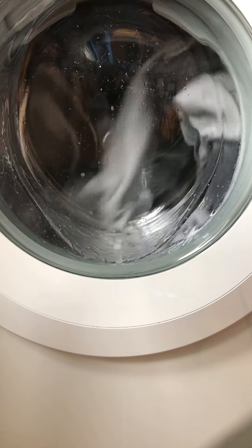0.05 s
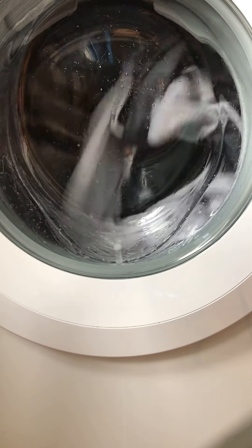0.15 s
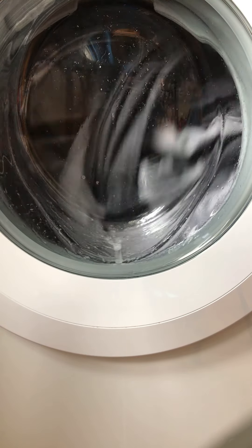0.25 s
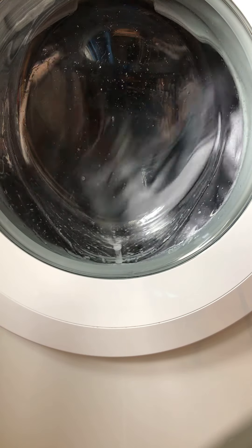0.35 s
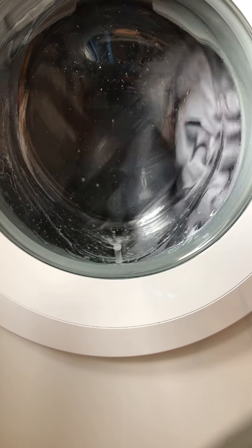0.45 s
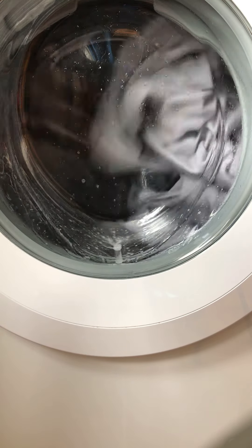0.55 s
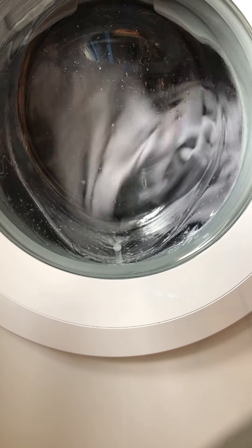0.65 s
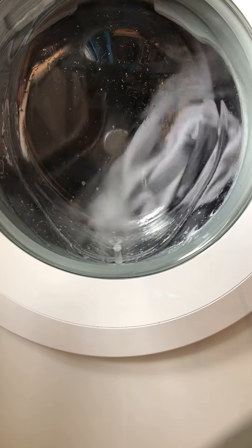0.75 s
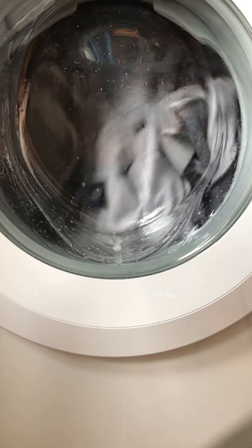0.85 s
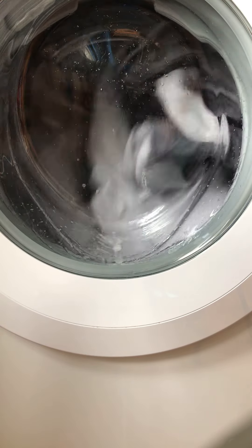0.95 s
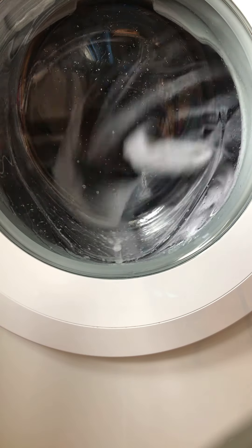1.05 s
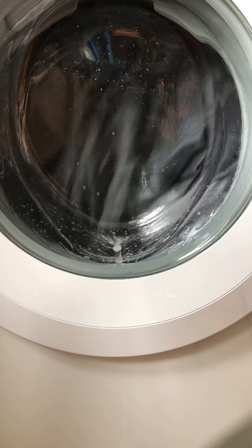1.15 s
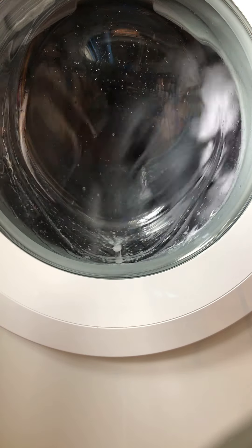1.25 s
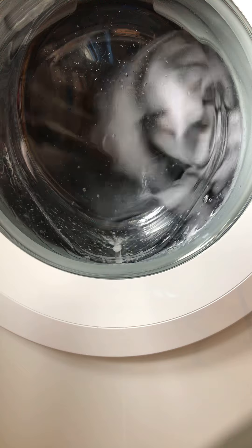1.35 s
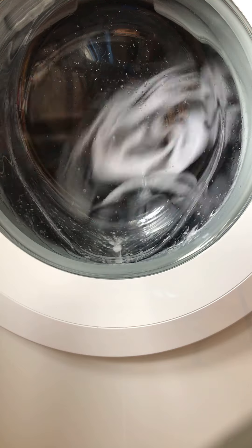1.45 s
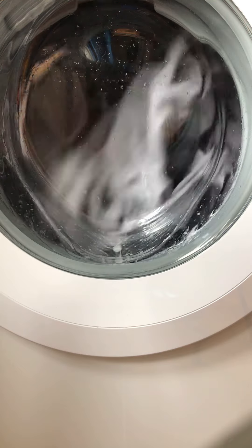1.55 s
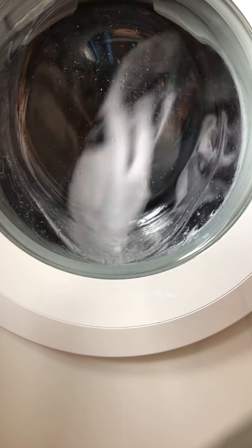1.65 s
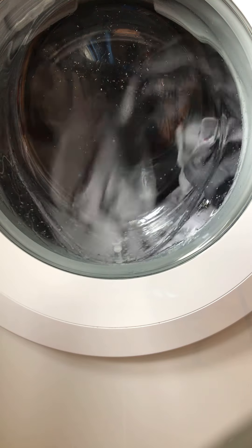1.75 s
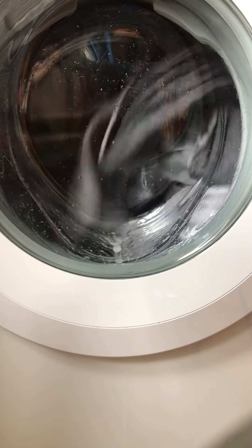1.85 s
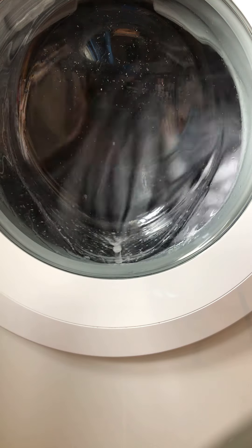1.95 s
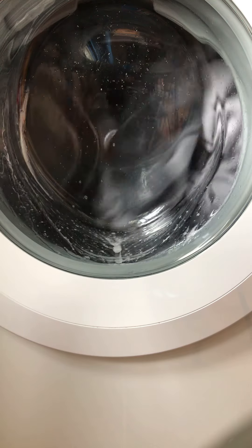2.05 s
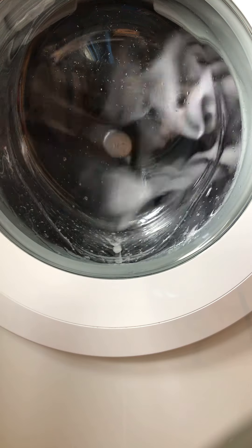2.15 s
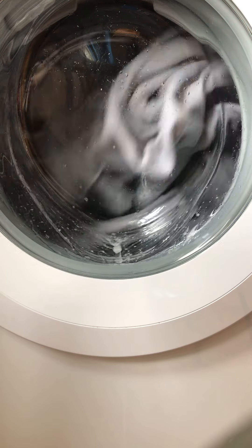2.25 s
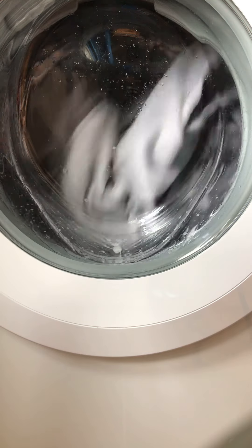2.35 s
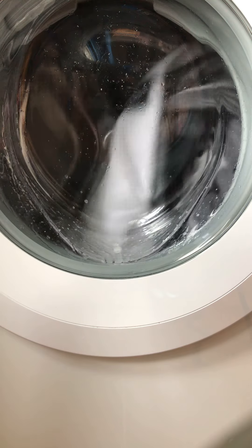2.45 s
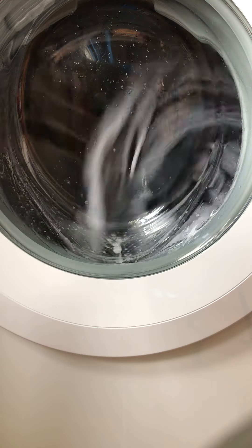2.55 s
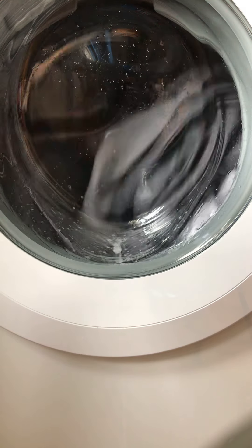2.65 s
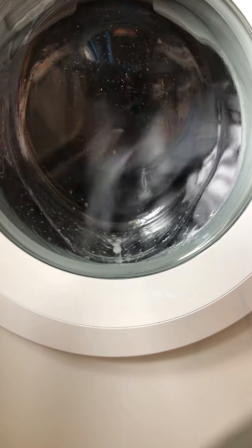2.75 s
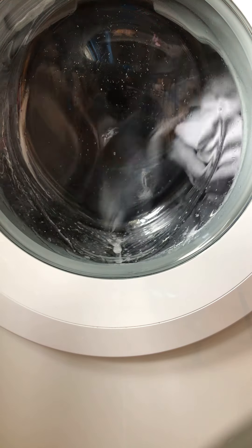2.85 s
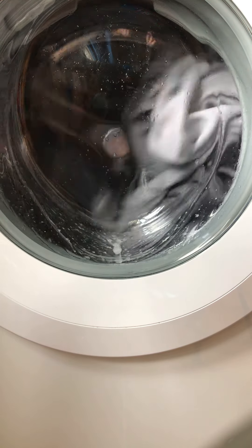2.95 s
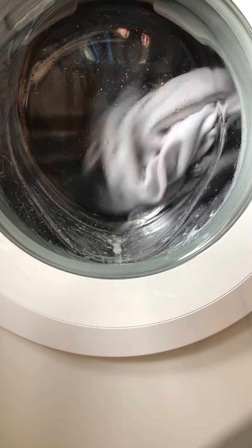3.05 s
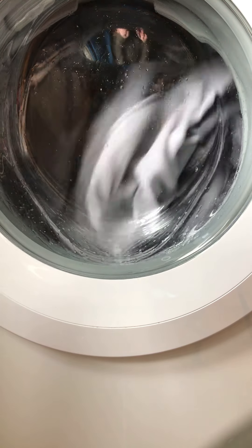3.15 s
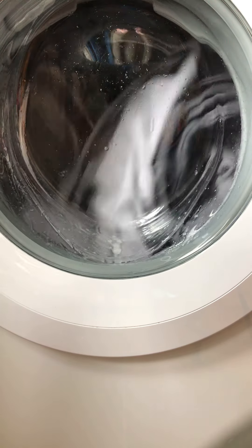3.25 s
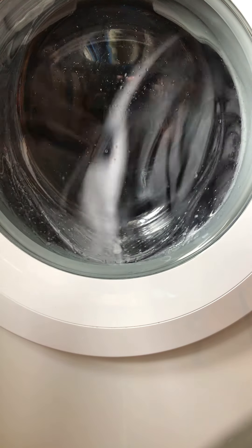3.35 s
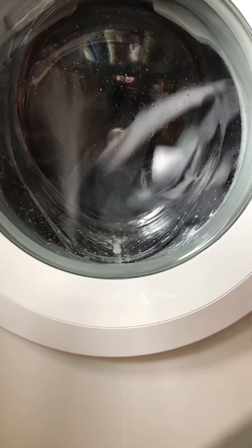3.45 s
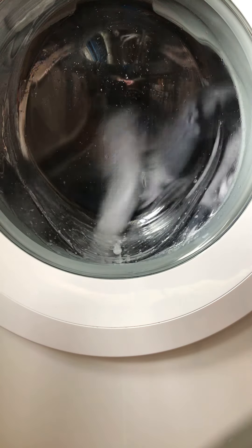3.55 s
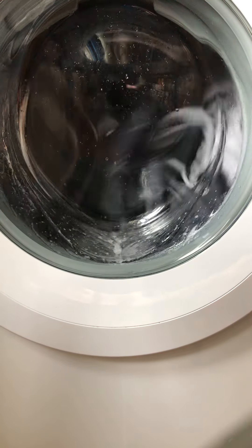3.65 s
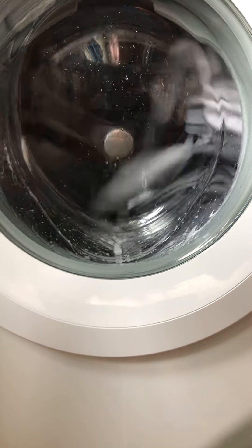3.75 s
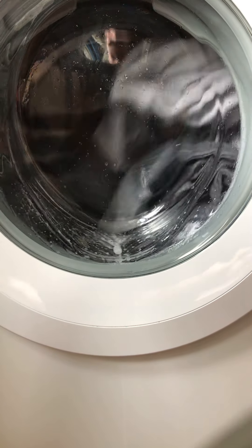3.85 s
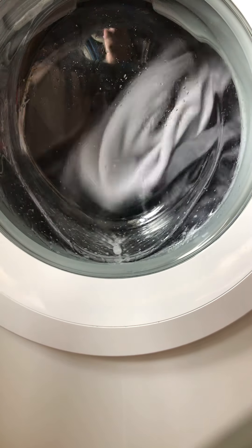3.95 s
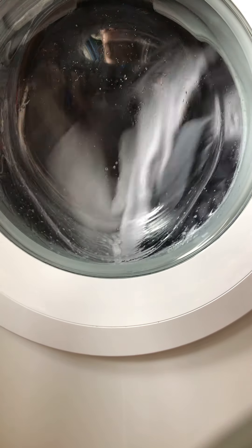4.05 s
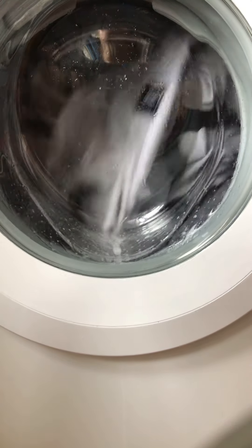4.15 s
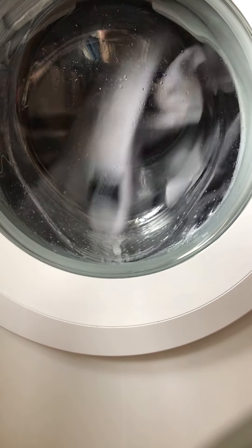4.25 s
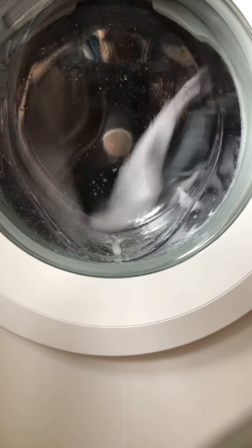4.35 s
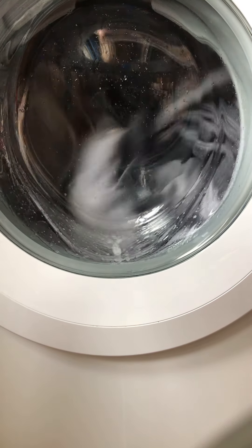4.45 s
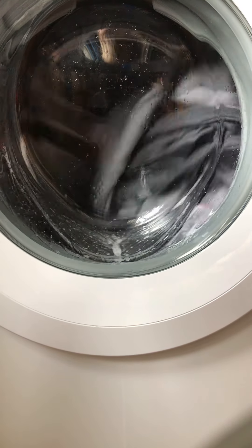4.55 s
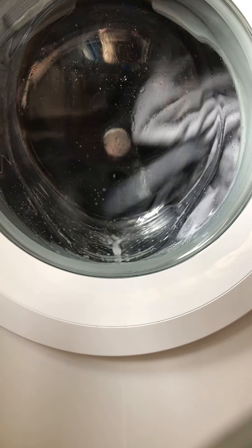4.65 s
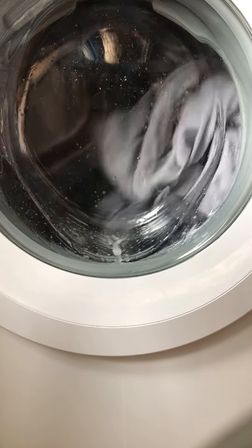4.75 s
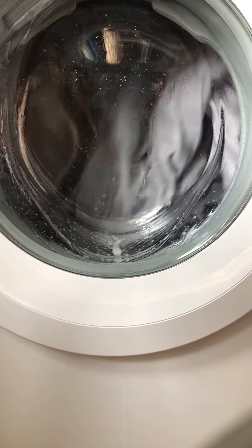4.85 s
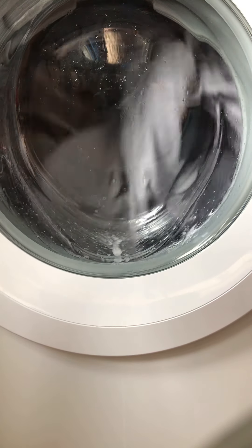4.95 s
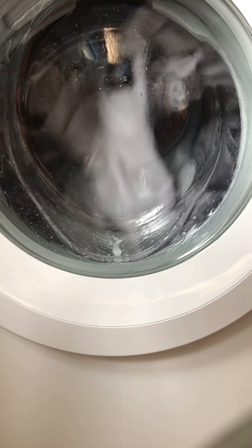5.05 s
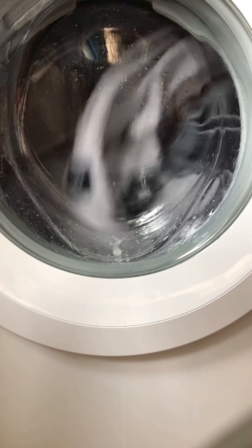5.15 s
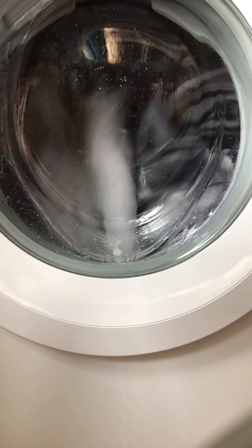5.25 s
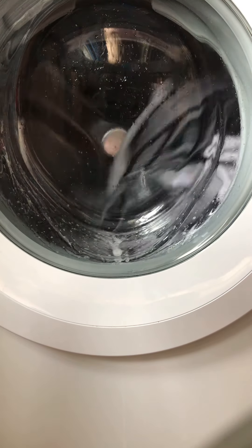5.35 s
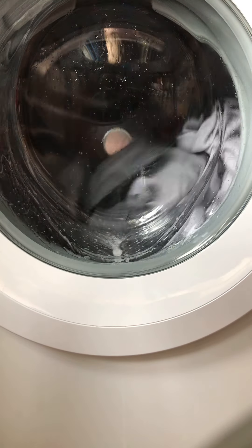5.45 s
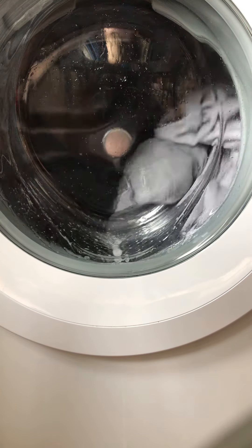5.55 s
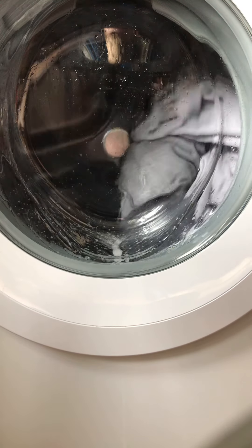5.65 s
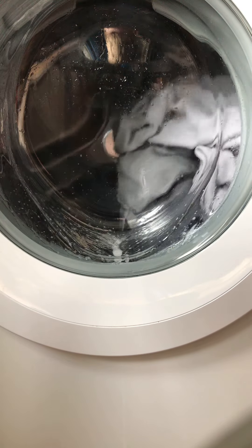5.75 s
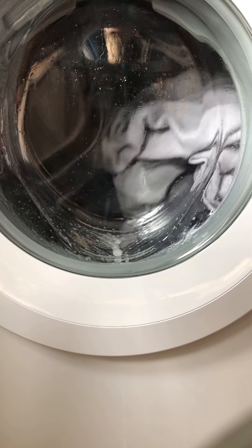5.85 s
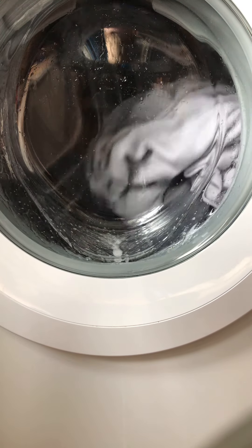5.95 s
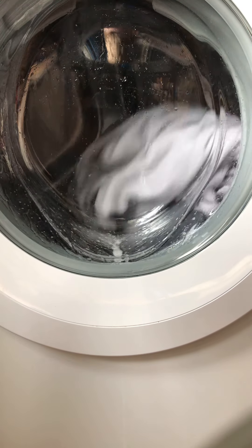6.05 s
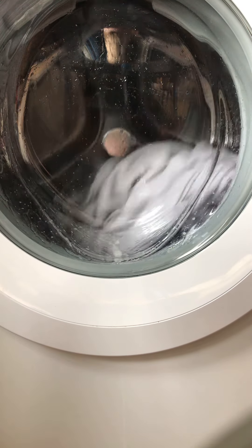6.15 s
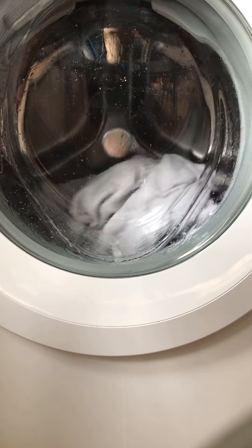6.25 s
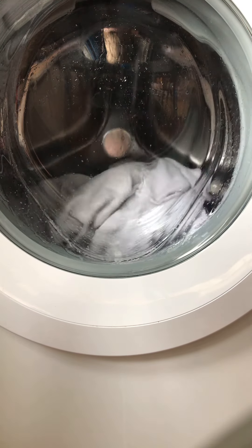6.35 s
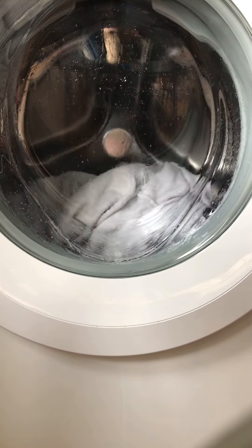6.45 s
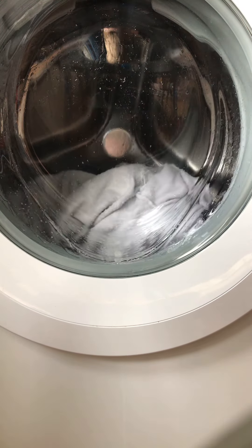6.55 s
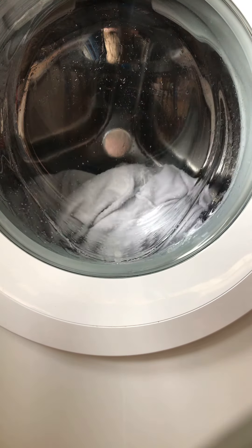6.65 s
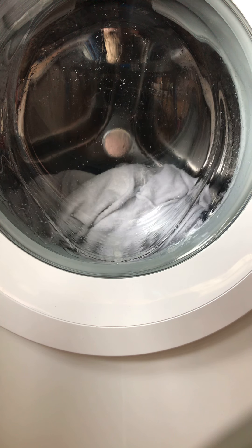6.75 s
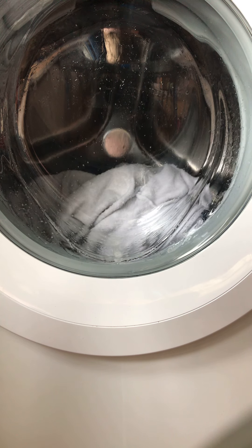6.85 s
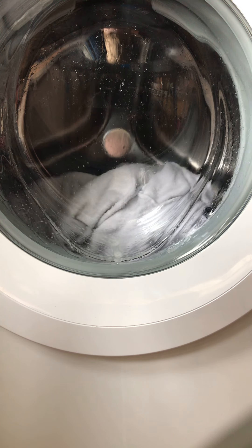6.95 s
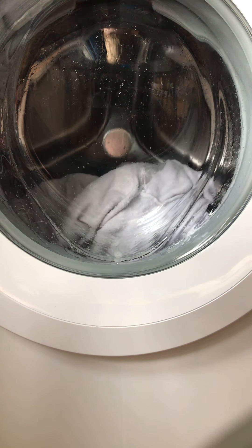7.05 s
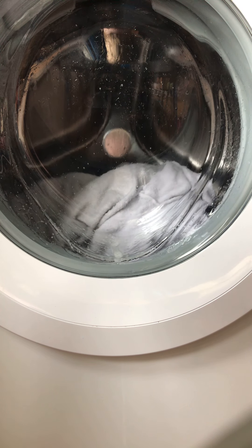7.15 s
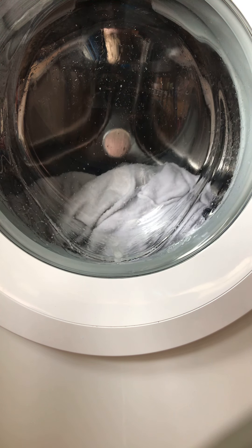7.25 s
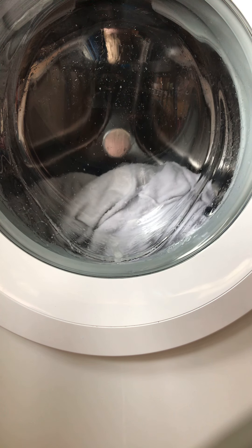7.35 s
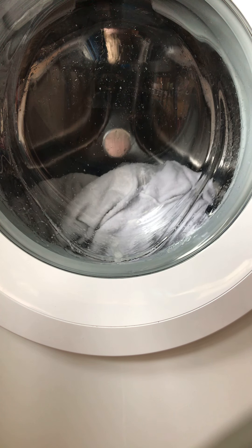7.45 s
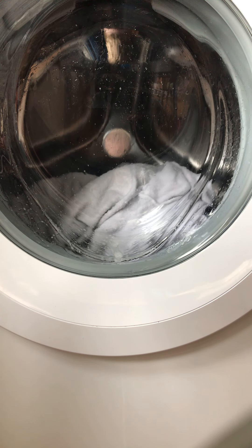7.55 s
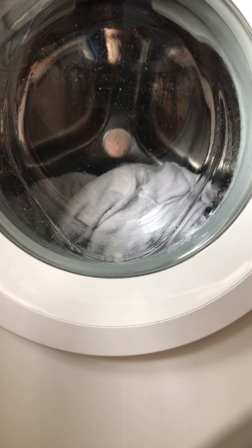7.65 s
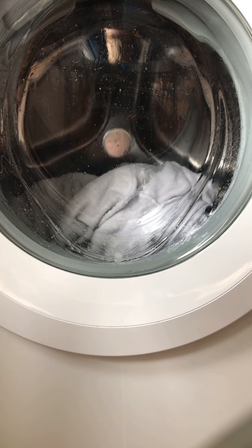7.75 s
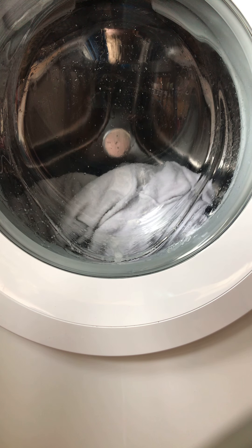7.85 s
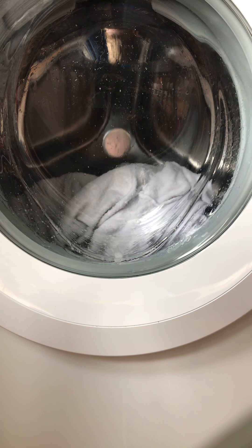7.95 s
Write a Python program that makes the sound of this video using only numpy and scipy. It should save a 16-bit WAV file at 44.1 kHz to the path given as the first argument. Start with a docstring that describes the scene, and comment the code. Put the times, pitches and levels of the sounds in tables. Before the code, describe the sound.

Behind a washing machine's glass door, soaked clothes tumble with splatting slaps, sloshing and gurgles for six seconds, then nearly quiet with a few drips.

```python
"""Wet wash tumbling behind a glass door

A front-loading washing machine turns wet laundry, with the microphone just outside the glass door.
Bursts of grains shaped by drum resonances make the slaps and spray; decaying low sines make the tub's thumps.
Sloshing noise, bubbles, notes of trapped air and dry ticks fill the gaps, with echoes off drum and room.
Near six seconds the drum comes to rest, leaving a low noise drone and a few drips."""
import sys
import numpy as np
from scipy import signal
from scipy.fft import rfft, irfft
from scipy.io import wavfile

SR = 44100
rng = np.random.default_rng(int(sys.argv[2]) if len(sys.argv) > 2 else 0)


def put_to_file(sound):
    """Save the sound as 16-bit audio at rate SR, in the file named by the first command-line argument."""
    columns = np.atleast_2d(sound).T  # one column per channel
    safe = np.clip(columns, -1, 1)
    whole_steps = np.round(safe * 32767)
    wavfile.write(sys.argv[1], SR, whole_steps.astype(np.int16))


N = 352800
TIME = np.arange(N) / SR  # s
TAPS = 8192
FREQS = np.fft.rfftfreq(TAPS, 1 / SR) + 1  # frequency grid of the filters, Hz

# wet cloth landing on the drum: [t/s, time to full contact/s, smack level/dB,
# weight: thud over smack/dB, wetness: spray over smack/dB]
CLOTH_LANDINGS = [(0.001, 0.011, -45, -3, -4), (0.024, .011, -44, 3.5, -4), (0.077, 0.0081, -31, -6.5, -8),
                  (0.119, 0.0091, -48.5, 5, 0.5), (0.305, 0.0085, -32.5, -11, -3.5),
                  (0.355, 0.039, -52, 7, -14), (0.506, 0.031, -49.5, 4, -12.5),
                  (0.68, 0.063, -54.5, 3.5, -9.5), (0.969, 0.016, -46.5, 8.5, -11.5),
                  (1.019, 0.0056, -36, -7, 4.5), (1.141, 0.007, -40.5, -13, -3.5),
                  (1.16, 0.049, -53.5, 4, -5.5), (1.245, 0.012, -45, 2, -16), (1.494, 0.0076, -53, 10, -13),
                  (1.571, 0.0079, -49.5, 10, 5.5), (1.651, 0.014, -37, -7.5, -4.5),
                  (1.821, 0.011, -41, 3, -11.5), (1.863, 0.0059, -45.5, 8, 9), (1.958, 0.0085, -41, -4, -8),
                  (2.02, 0.011, -42.5, -2.5, -4), (2.179, 0.016, -50, 3, -10), (2.415, 0.024, -56.5, 3, -8),
                  (2.515, .011, -34.5, -7.5, -11), (2.665, .013, -39, -1, -14),
                  (2.684, 0.0057, -38, -1.5, 0.5), (2.829, 0.0095, -40, 1, -13), (2.955, 0.038, -52, 7, -7),
                  (3.149, 0.0077, -44, 5.5, -11), (3.455, 0.038, -54, -1, -5),
                  (3.511, 0.0085, -40.5, 8.5, -11.5), (3.726, 0.005, -50, 2.5, -18),
                  (3.772, 0.0095, -32.5, -2, -17), (3.995, 0.038, -53, 4.5, -7.5),
                  (4.11, 0.045, -56, 0, -8.5), (4.308, 0.065, -51.5, -2, -10.5),
                  (4.585, 0.0071, -41, 3, -14.5), (4.695, 0.0092, -43.5, -4, -2),
                  (4.72, 0.0082, -45.5, 9, -24), (4.787, 0.0048, -47.5, 1, 7.5), (5.12, 0.03, -52.5, 1, -8),
                  (5.293, 0.011, -43, 11, -11), (5.508, 0.012, -50, 4, -16),
                  (5.531, 0.0055, -43.5, 1.5, -11), (5.565, 0.0063, -41.5, 5.5, -20),
                  (5.965, .03, -68.5, 2, -7), (6.11, 0.03, -71.5, -2, -8)]


def amp(db):
    """Decibels to gain."""
    return 10 ** (np.asarray(db) / 20)


def unit(x):
    """Scales to rms 1."""
    return x / np.sqrt(np.mean(x ** 2) + 1e-20)


def shape(points):
    """Gain over frequency from (f/Hz, level/dB) points, joined on a log frequency axis."""
    hz, db = np.transpose(points)
    return amp(np.interp(np.log(FREQS), np.log(hz), db))


def add(mix, s, sound):
    """Mixes a sound in at a time."""
    part = mix[max(round(s * SR), 0):][:len(sound)]
    part += sound[:len(part)]


def colour(x, gain):
    """Causal, minimum-phase filter of unit energy: resonances ring after the blow."""
    log_gain = np.log(np.maximum(gain / gain.max(), 1e-5))
    circle = np.concatenate([log_gain, log_gain[-2:0:-1]])
    spectrum = np.exp(np.conj(signal.hilbert(circle)))
    ring = np.fft.ifft(spectrum).real
    return signal.oaconvolve(x, ring / np.linalg.norm(ring))[:N]


def wander(per_s):
    """Slow chance of rms 1: noise with a Gaussian roll-off above per_s (Hz)."""
    hz = np.fft.rfftfreq(N, 1 / SR)
    spectrum = rfft(rng.standard_normal(N)) * np.exp(-(hz / per_s) ** 2)
    return unit(irfft(spectrum, N))


def grains(per_s, spread_db):
    """Tiny water impacts of random time, sign and size, scaled to rms 1."""
    size = amp(spread_db * np.minimum(rng.exponential(1, N), 4))
    sign = rng.choice([-1., 1.], N)
    struck = rng.random(N) < per_s / SR
    return unit(size * sign * struck)


def swells(rows):
    """Level of overlapping bursts (t/s, rise/s, peak/dB): quick ones snap on, slow ones swell; all die away."""
    roundness, soft_s = 1.05, 0.015  # exponent of a quick burst; slower rises are rounder still
    power = np.zeros(N)
    for s, rise, db in rows:
        u = TIME[:SR // 2] / max(rise, .001)
        burst = (u * np.exp(1 - u)) ** max(roundness, rise / soft_s)
        add(power, s, (amp(db) * burst) ** 2)
    return np.sqrt(power)


def drum(low_hz, high_hz, ringing=1, order=8):
    """Response of drum and door to a force over one band; wet cloth lying on the steel lessens the ringing."""
    # resonances of the drum and door: [f/Hz, width/Hz, level over the broad response at full ringing/dB]
    drum_modes = [(256.4, 4.1, 11), (314, 7.9, 13), (383, 18.4, 9), (467, 6.5, 5), (500, 127, 10),
                  (553.6, 12.4, 15), (905, 13, 11), (1083, 60, 12.5), (1222.4, 59, 13.5), (1340, 45, 7),
                  (1600, 94, 7), (1760, 81, 1.5), (1737, 147, 4), (2626, 150, 2.5), (2950, 95, -5),
                  (3850, 160, -2), (3810, 48, 5), (5410, 53, 10), (6430, 1200, 5)]
    # broad response of the drum through the door: [f/Hz, relative level/dB]
    through_door = [(100, 18), (200, 0.5), (330, 1.5), (560, -1), (740, -4.5), (1200, -3.5), (1800, -4),
                    (2300, -8), (3600, -11), (4700, -19), (6500, -23.5), (9000, -26.5), (11000, -29.5),
                    (15500, -23.5)]
    peaks = sum((amp(db) ** 2 - 1) / (1 + (2 * (FREQS - hz) / width) ** 2)
                for hz, width, db in drum_modes)
    band = 1 / (1 + (low_hz / FREQS) ** order) / (1 + (FREQS / high_hz) ** order)
    return shape(through_door) * np.sqrt(np.maximum(1 + ringing * peaks, .1) * band)


def echoes(x, wet_db, low_t60, high_t60):
    """Dense reflections in the steel drum and the small room; bass and treble decay at their own t60 (s)."""
    count = SR // 2
    build_up = np.minimum(TIME[:count] / 0.0035, 1)
    taps = rng.standard_normal(count) * (rng.random(count) < .1) * build_up
    hz, t, z = signal.stft(taps, SR, nperseg=256)
    t60 = np.interp(np.log(hz + 1), np.log([300, 6000]), [low_t60, high_t60])
    decay = np.exp(-np.log(1000) * t / t60[:, None])
    tail = signal.istft(z * decay, SR, nperseg=256)[1]
    return amp(wet_db) * signal.oaconvolve(x, tail / np.linalg.norm(tail))[:N]


def turning_echoes(x, turns_per_s, count=3):
    """The load shifts as the drum turns, so the sound fades between several patterns of reflections."""
    wet = np.zeros(N)
    for k in range(count):
        share = np.cos(np.pi * (turns_per_s * TIME + k / count)) * np.sqrt(2 / count)
        wet += echoes(x * share, wet_db=-4, low_t60=0.29, high_t60=0.28)
    return x + wet


def drone():
    """Steady low noise of the machine and the room."""
    # spectrum of the machine at rest: [f/Hz, relative level per Hz/dB]
    rest_spectrum = [(20, -41), (40, -5), (60, -20.5), (100, -9), (170, -4.5), (420, -8), (700, -11),
                     (1250, -15), (2000, -21), (4500, -24), (6200, -23.5), (10000, -34), (12500, -31.5),
                     (15500, -35)]
    level_db = -68.5
    return amp(level_db) * colour(rng.standard_normal(N), shape(rest_spectrum))


def rumble():
    """Low noise of the tub: it sways on its springs and is shaken by every slap."""
    # the tub swaying on its springs: [t/s, level/dB]
    tub_sway = [(0.0, -52), (0.18, -64.5), (1.31, -66), (1.8, -55), (2.16, -60), (3.43, -59.5),
                (3.96, -53.5), (5.08, -65.5), (5.39, -57), (5.84, -73), (8.0, -72)]
    # spectrum of the tub's low noise: [f/Hz, relative level per Hz/dB]
    tub_spectrum = [(24, -23.5), (40, -11.5), (60, -0.5), (75, 0), (93, -1), (115, -5.5), (160, -14),
                    (260, -11.5), (600, -67)]
    shake_s, shake_over_thud_db = 0.028, -13  # time to the peak, level
    shakes = swells((s, shake_s, smack_db + weight_db + shake_over_thud_db)
                    for s, _, smack_db, weight_db, _ in CLOTH_LANDINGS)
    sway = amp(np.interp(TIME, *np.transpose(tub_sway)))
    return colour(np.hypot(sway, shakes) * rng.standard_normal(N), shape(tub_spectrum))


def thumps(ring_cycles, sag, bend, bend_s):
    """The tub swings up while the load pushes on it, then rings down in a few cycles; its pitch sinks."""
    # heavy drops that rock the tub: [t/s, peak level before the unevenness/dB, f before the bend/Hz, push/s]
    heavy_drops = [(0.08, -44, 133, 0.047), (1.556, -36, 91, .01), (1.581, -37.5, 42.6, 0.024),
                   (2.768, -46.5, 87, .047), (3.193, -45.5, 91, 0.048), (3.51, -42, 64.5, .012),
                   (3.511, -41, 130, 0.014), (3.733, -34.5, 95.8, 0.022), (3.778, -36, 87.6, .031),
                   (4.039, -25.5, 100.2, 0.065), (4.136, -37.5, 95.8, 0.037), (4.727, -38, 99.4, .008),
                   (4.728, -44, 180, 0.018), (5.173, -47, 96.3, 0.058), (7.025, -50.5, 95.2, 0.058),
                   (7.56, -60, 103, 0.1), (7.68, -57.5, 106.5, 0.056)]
    out, t = np.zeros(N), TIME[:SR // 2]
    for s, db, hz, push in heavy_drops:
        rise = np.sin(np.pi / 2 * np.minimum(t / push, 1)) ** 2
        decay = np.exp(-np.maximum(t - push, 0) * hz / ring_cycles)
        high_start = bend * np.exp(-t / bend_s)
        sinking = sag * np.tanh((t - push) * hz / ring_cycles)
        pitch = hz * (1 + high_start - sinking)
        add(out, s, amp(db) * rise * decay * np.sin(2 * np.pi * np.cumsum(pitch) / SR))
    uneven_db = 2.0 * wander(45)  # a load never pushes quite evenly
    return out * amp(uneven_db)


def stirring():
    """Level of the water stirred by the drum (dB), gone once the load lies still."""
    # how hard the turning load stirs the water: [t/s, level before settling/dB]
    load_stir = [(0.14, -54), (0.58, -55), (0.78, -55.5), (1.03, -60), (1.15, -53.5), (1.57, -51.5),
                 (1.88, -53), (2.33, -53.5), (2.74, -53), (3.33, -56), (3.95, -54.5), (4.33, -54.5),
                 (5.46, -55), (5.64, -70.5), (6.2, -64.5)]
    rest_s, settle_db_per_s = 6.17, 110
    return np.interp(TIME, *np.transpose(load_stir)) - settle_db_per_s * np.maximum(TIME - rest_s, 0)


def splash(delay_s):
    """Level of the water that falls back after each slap, peaking delay_s later."""
    return swells((s, delay_s, smack_db) for s, _, smack_db, _, _ in CLOTH_LANDINGS)


def bubbles(per_s, cycles, glide, spread_db):
    """Small bubbles burst at random; each is a short note that rises as it nears the surface."""
    out, t = np.zeros(N), TIME[:SR // 25]
    for when, pitch, size in rng.random((int(per_s * N / SR), 3)):
        hz = 600 * 7 ** pitch
        age = t * hz / cycles
        level = amp(spread_db * size) / hz ** 0.54  # small, high bubbles are weaker
        note = np.sin(2 * np.pi * hz * t * (1 + glide * age))
        add(out, when * TIME[-1], level * age * np.exp(-age) * note)
    return unit(out)


def tumble():
    """Lumpy sloshing, fine trickles and bubbles follow the turning load; each slap whips up more bubbles."""
    stir_db = stirring()
    slosh_level = amp(stir_db)
    trickle_level = amp(-28.5 + 0.72 * stir_db)  # follows the stirring less than the sloshing does
    slosh = slosh_level * amp(3.4 * wander(37)) * grains(1200, spread_db=3.0)
    water = colour(slosh, drum(165, 1730, ringing=0.71))
    drips = trickle_level * amp(3.1 * wander(27)) * grains(3500, spread_db=-3.0)
    trickle = colour(drips, drum(2160, 12500, ringing=0.73))
    froth_level = amp(-16.5) * slosh_level + amp(-12.5) * splash(delay_s=0.018)
    froth = froth_level * bubbles(per_s=150, cycles=2.42, glide=0.0099, spread_db=12.5)
    return amp(-6.5) * water + trickle + froth


def ticks(rise_s):
    """Short dry noise bursts round one pitch, with wide skirts."""
    # small dry ticks, perhaps fasteners on the steel, then falling drops:
    # [t/s, rms level at the start, before rise and decay/dB, centre f/Hz, half-width/octaves]
    dry_ticks = [(3.95, -42.5, 1850, 1), (4.011, -50, 3400, 0.17), (6.68, -69, 1370, 0.27),
                 (6.902, -69.5, 2700, .3), (6.934, -63, 1100, 0.27), (7.149, -61.5, 2820, .25),
                 (7.171, -72, 2900, .25)]
    t60 = 0.079  # s
    out, t = np.zeros(N), TIME[:TAPS]
    envelope = np.minimum(t / rise_s, 1) * np.exp(-np.log(1000) * t / t60)
    for s, db, hz, octaves in dry_ticks:
        skirts = 1 / (1 + (np.log2(FREQS / hz) / octaves) ** 2) / (1 + (FREQS / hz / 2) ** 4)
        burst = unit(irfft(rfft(rng.standard_normal(TAPS)) * skirts))
        add(out, s, amp(db) * burst * envelope)
    return out


def pockets(swell_share, rough, flutter_db):
    """Each air pocket swells into its note and dies away, wavering as the cloth squeezes it."""
    # trapped air, from deep gulps under the cloth to the last small drips:
    # [t/s, peak level before the flutter/dB, f/Hz]
    air_pockets = [(0.081, -36, 496), (0.308, -31.5, 1212), (0.311, -34, 3530), (0.528, -40.5, 1212),
                   (1.246, -43.5, 271.7), (1.256, -40, 1070), (1.829, -30, 323), (1.964, -33.5, 1200),
                   (2.021, -34.5, 1210), (2.516, -39.5, 543), (2.676, -33, 314.3), (3.513, -45, 336),
                   (3.777, -39.5, 324.6), (4.726, -45.5, 387), (5.294, -35.5, 391.3), (5.532, -41.5, 1099),
                   (5.536, -42, 319.4), (6.931, -69, 1140), (7.153, -60, 2550), (7.685, -67, 1570)]
    t60_at_1khz, shortening = 0.12, 0.75  # s, exponent: small pockets die sooner than large ones
    out, t = np.zeros(N), TIME[:SR // 2]
    waver = rough * wander(42)  # phase, rad
    for s, db, hz in air_pockets:
        t60 = t60_at_1khz / (hz / 1000) ** shortening
        ring = (1 - np.exp(-t / (swell_share * t60))) ** 2 * np.exp(-np.log(1000) * t / t60)
        note = np.sin(2 * np.pi * hz * t + np.interp(s + t, TIME, waver))
        add(out, s, amp(db) * ring / ring.max() * note)
    return out * unit(amp(flutter_db * wander(62)))


def slaps():
    """Each landing squeezes out a burst of water impacts: heavy cloth thuds, wet cloth sprays and fizzes."""
    # parts of a slap, from the cloth's weight to the finest droplets: [low f/Hz, high f/Hz, grains per s]
    slap_parts = [(184, 810, 3000), (823, 2510, 1800), (2200, 6760, 3800), (6780, 10900, 5000)]
    # fine spray flung against the door: [t/s, rise/s, level/dB]
    door_spray = [(0.002, 0.0075, -39.5), (0.078, 0.015, -50), (0.305, .008, -54), (0.62, 0.097, -69),
                  (1.019, 0.0058, -48.5), (1.572, 0.0076, -49), (2.685, 0.0047, -51.5),
                  (3.742, 0.0029, -51.5), (4.461, 0.0023, -61)]
    s, contact, smack_db, weight_db, wetness_db = np.transpose(CLOTH_LANDINGS)
    spray_db = smack_db + wetness_db
    fizz_db = -39.5 + 0.52 * spray_db  # the finest droplets grow more slowly than the spray
    thud, smack, spray, fizz = (swells(zip(s, contact, db))
                                for db in (smack_db + weight_db, smack_db, spray_db, fizz_db))
    levels = thud, smack, spray, np.hypot(fizz, swells(door_spray))
    folds = unit(amp(1.8 * wander(130)))  # the cloth lands fold by fold, in a few quick splats
    out = np.zeros(N)
    for level, (low_hz, high_hz, per_s) in zip(levels, slap_parts):
        impacts = level * folds * grains(per_s, spread_db=-0.62)
        out += colour(impacts, drum(low_hz, high_hz))
    return out


def scene():
    """Water and cloth sound inside the drum; the bass comes straight through the cabinet."""
    bass = drone() + rumble() + thumps(ring_cycles=4.05, sag=0.058, bend=0.38, bend_s=0.014)
    near = ticks(rise_s=0.00052) + pockets(swell_share=0.019, rough=0.4, flutter_db=2.5)
    near_echoes = echoes(near, wet_db=-16, low_t60=0.79, high_t60=0.19)
    inside = turning_echoes(tumble() + slaps(), turns_per_s=0.791)
    return (bass + near + near_echoes + inside)[None]


def record(dry):
    """The microphone chain's band limit: a linear-phase low-pass."""
    edge_hz = 15900
    low_pass = signal.firwin(511, edge_hz, window=("kaiser", 9), fs=SR)
    return signal.oaconvolve(dry, low_pass[None], "same")


dry = scene()
out = record(dry)
put_to_file(out)
```